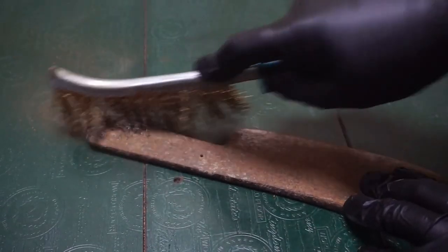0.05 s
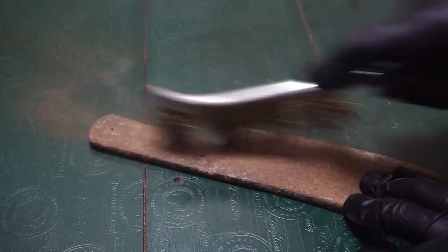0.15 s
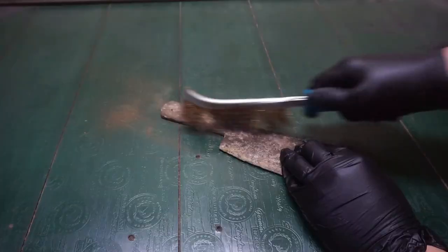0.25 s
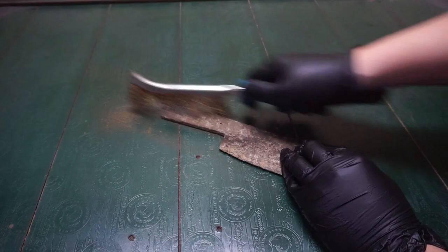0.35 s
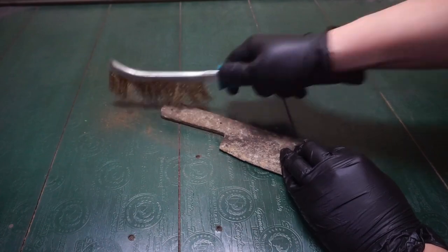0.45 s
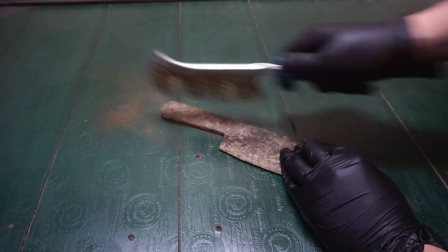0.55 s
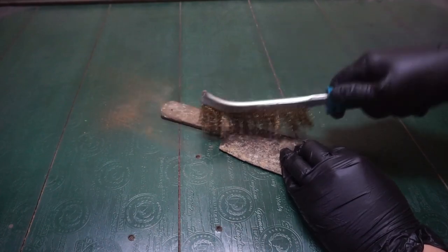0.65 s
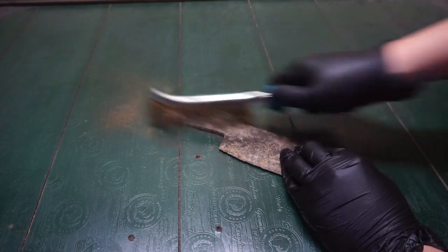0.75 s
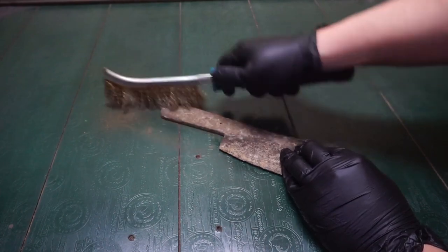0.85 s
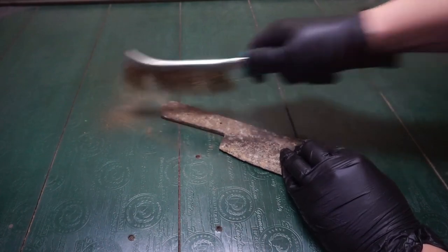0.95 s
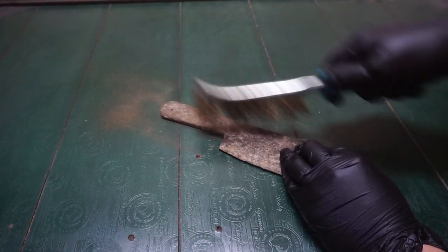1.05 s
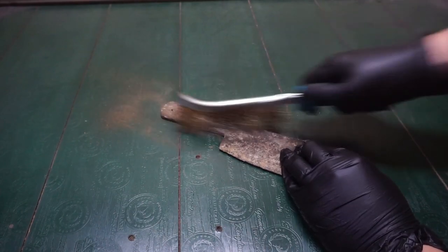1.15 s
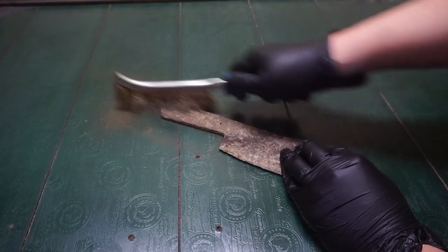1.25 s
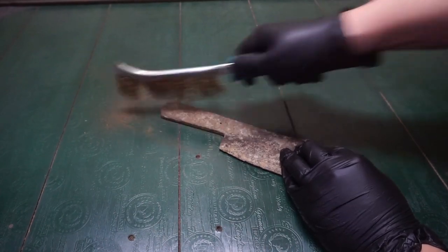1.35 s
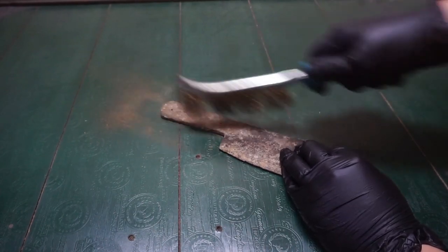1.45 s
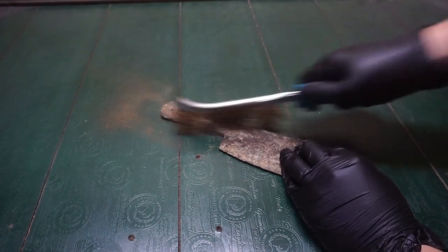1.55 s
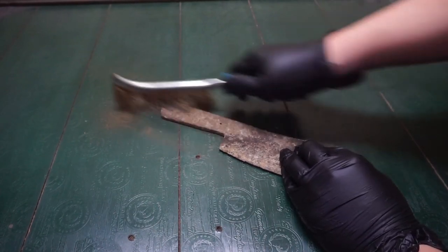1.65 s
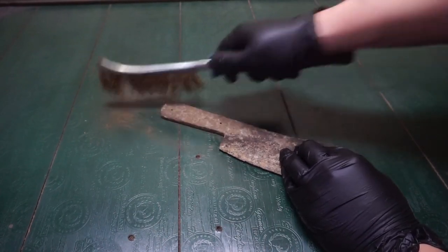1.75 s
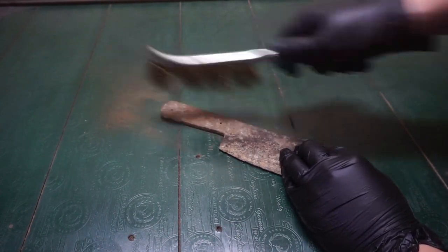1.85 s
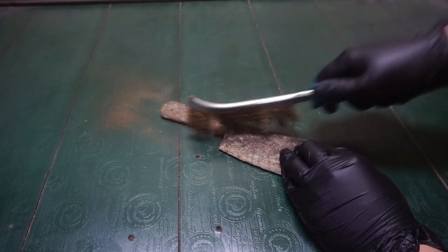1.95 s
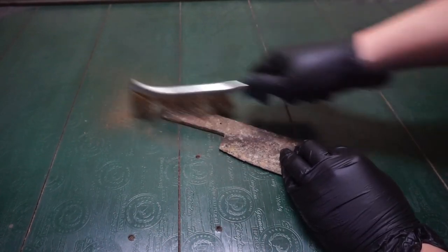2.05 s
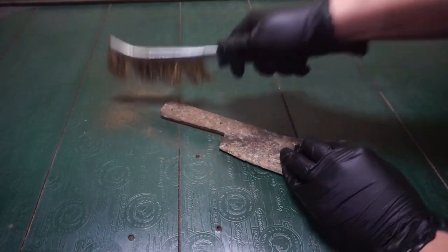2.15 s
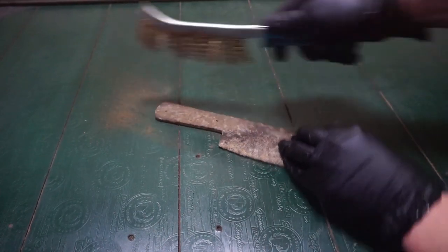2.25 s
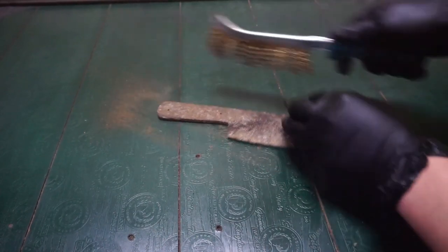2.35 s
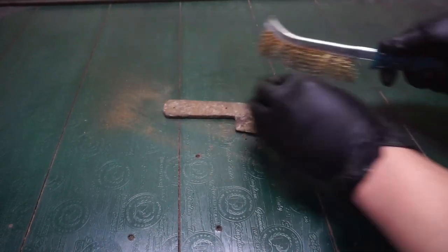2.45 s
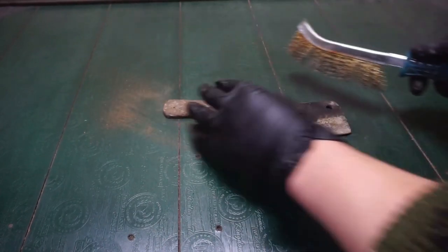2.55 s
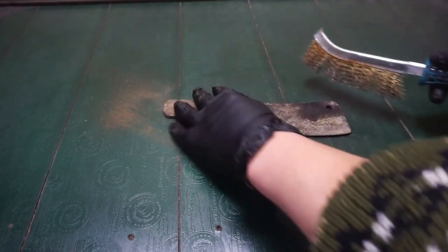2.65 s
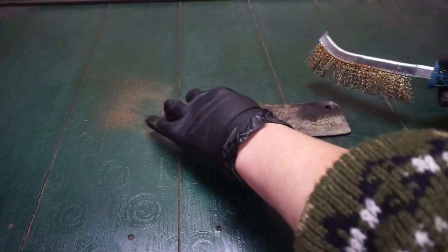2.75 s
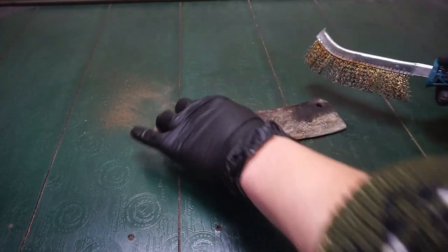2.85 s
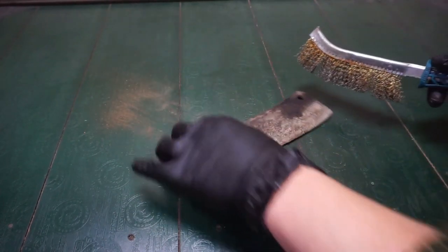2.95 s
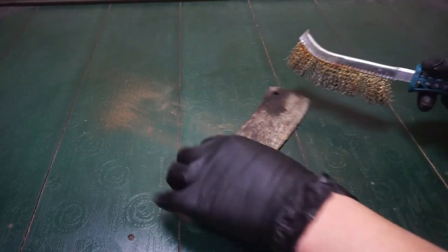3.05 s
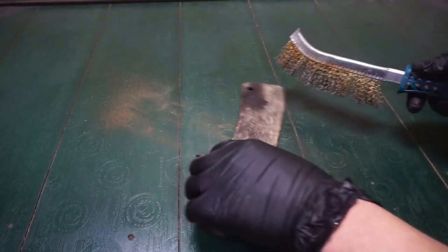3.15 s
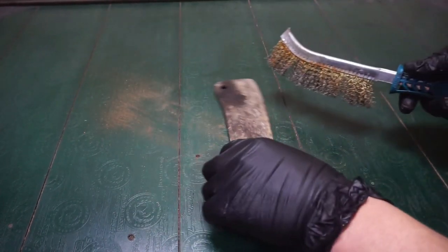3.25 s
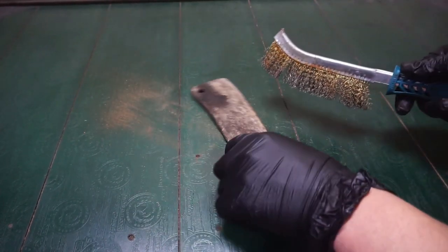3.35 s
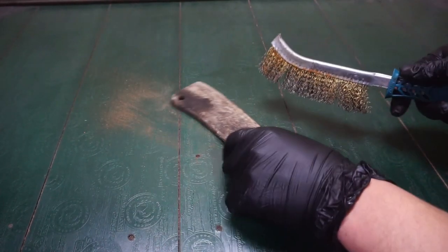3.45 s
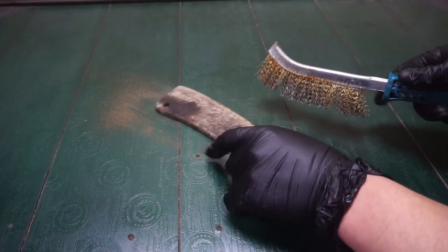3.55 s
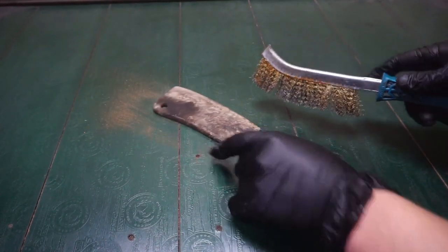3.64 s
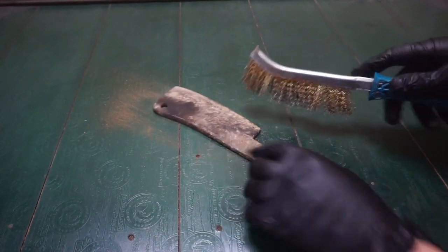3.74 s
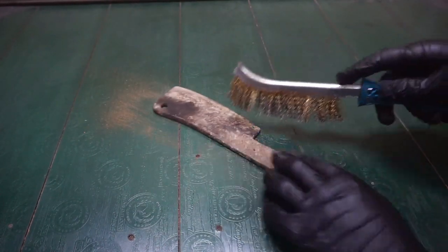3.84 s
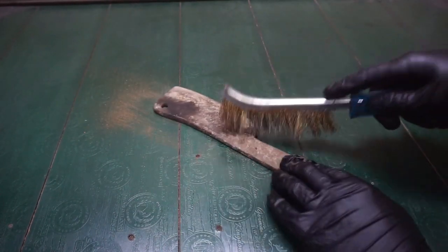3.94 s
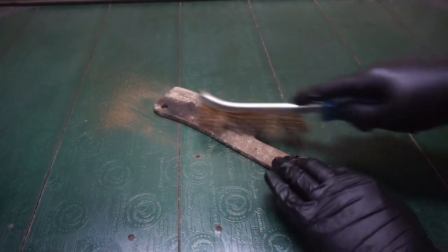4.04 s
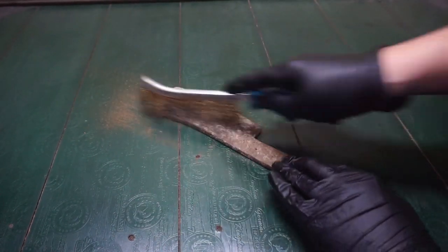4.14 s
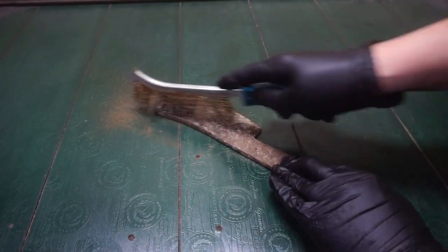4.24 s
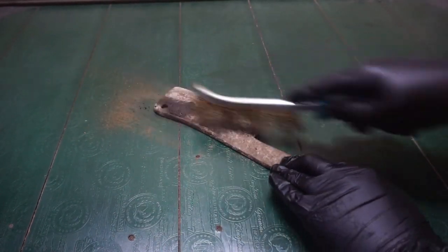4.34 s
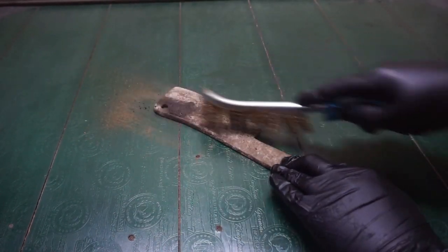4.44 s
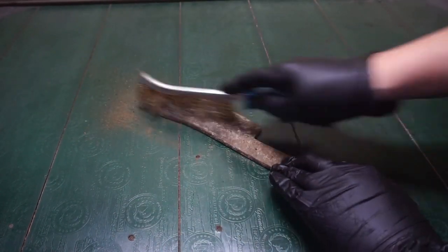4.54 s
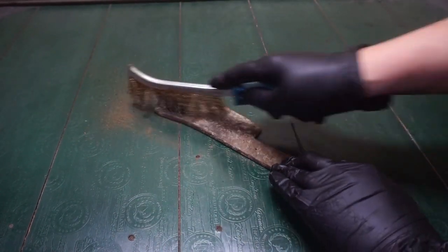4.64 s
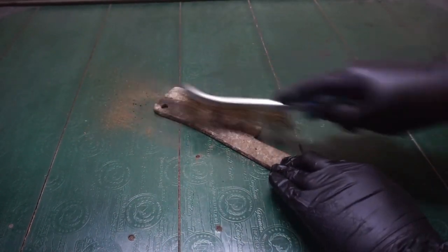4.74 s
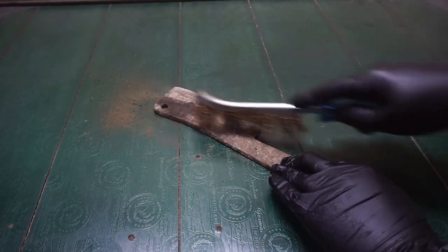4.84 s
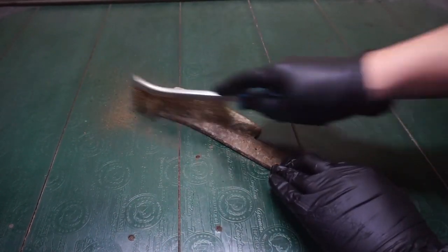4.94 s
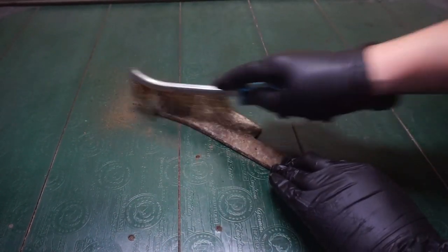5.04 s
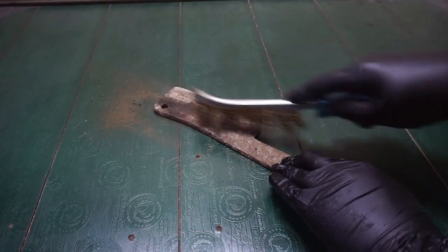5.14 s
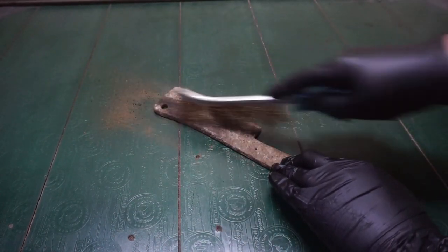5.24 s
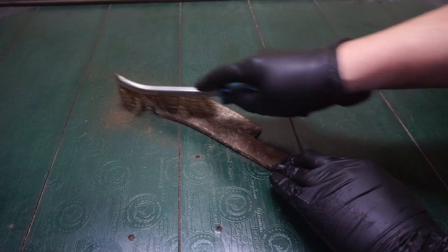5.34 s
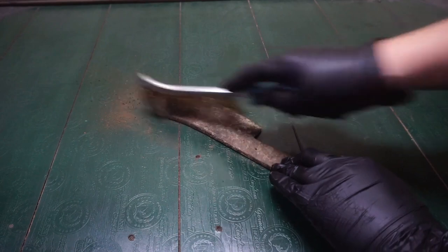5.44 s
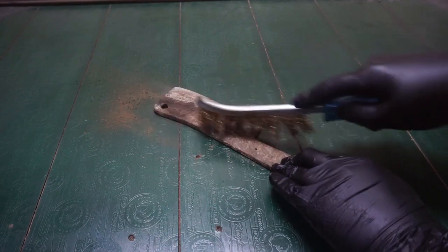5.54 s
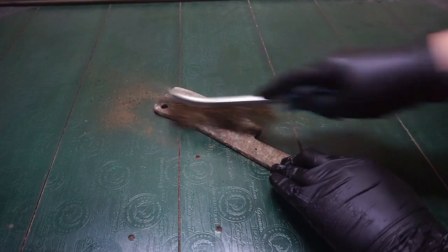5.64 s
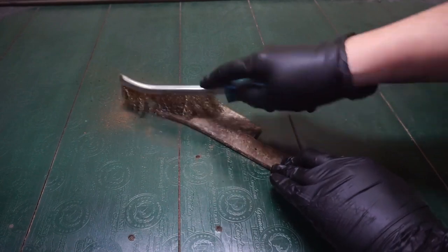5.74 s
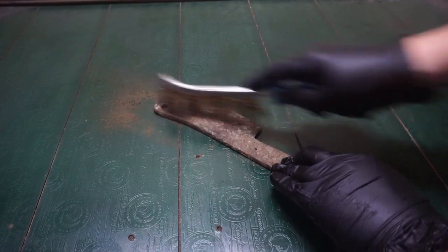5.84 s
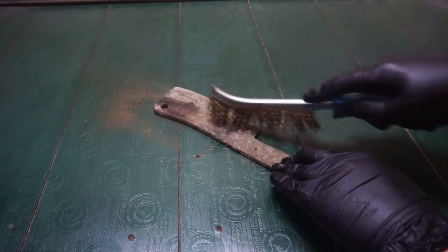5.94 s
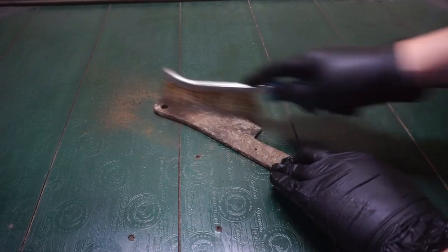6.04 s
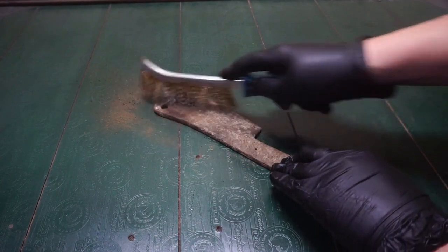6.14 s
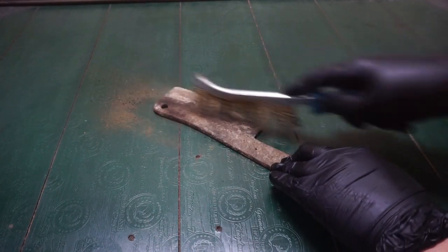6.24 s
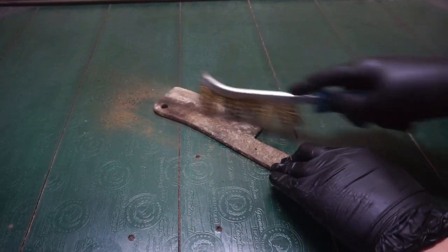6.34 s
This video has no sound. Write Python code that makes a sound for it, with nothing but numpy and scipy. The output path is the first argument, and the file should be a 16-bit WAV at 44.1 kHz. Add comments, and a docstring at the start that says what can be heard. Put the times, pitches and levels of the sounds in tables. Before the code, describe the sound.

Harsh, sizzling scrapes of stiff wire bristles on rusted metal, with hollow board drone and small thuds between them. After a brief lull, heavy metal grates and bumps over the planks as it is turned, with tiny crumbs snapping. Then faster alternating scrubs continue to the end, brighter and almost unbroken. Heard close in stereo, in a small room with a short echo.

```python
"""A brass wire brush scrubs a rusty steel cleaver that is held down on a wooden bench, in a small room.
Long strokes hiss along its handle, five of them after a knock on the bench as the brush lands.
The cleaver then judders round over the boards by stick and slip, with jolts and a few snapping crumbs.
Last, the brush lands on the blade and scrubs it with quick to-and-fro strokes.
Random wire catches are shaped into hiss and rasp, and excite resonances of wires, steel and boards."""
import sys
import numpy as np
from scipy import signal
from scipy.fft import rfft, irfft, next_fast_len
from scipy.io import wavfile
from scipy.ndimage import uniform_filter1d, map_coordinates

SR = 44100
rng = np.random.default_rng(int(sys.argv[2]) if len(sys.argv) > 2 else 0)


def master_out(mix):
    """Clip the mix to full scale and print it as 16-bit PCM to the path in sys.argv[1]."""
    frames = np.transpose(np.atleast_2d(mix))
    ceiling = np.clip(frames, -1, 1)
    pcm = np.round(ceiling * 32767).astype(np.int16)
    wavfile.write(sys.argv[1], SR, pcm)


N = 281794

# Landings of the brush, tip then heel; levels before the gains in contacts():
# start_s, tip_db, heel_db, scratch_db (relative to the blow), tick_db (first wires), crumple_db, boom_db
LANDINGS = [(0.285, -26.5, -41, -20, -62, -50, -54), (0.665, -33.5, -24.5, -1, -43, -43, -48),
            (1.101, -33.5, -30.5, -16, -51, -49.5, -51.5), (1.510, -41, -47, -15, -53, -51.5, -50.5),
            (1.954, -32, -31.5, -7.5, -51, -46.5, -51), (3.999, -48, -48, -17, -57, -64, -78)]
# Resonances of the bench top: pitch_hz, width_hz, level_db (relative)
BENCH_MODES = [(172, 11, -22.5), (225.3, 4.7, -11), (271, 22, -13), (352, 10, 1.5), (395.7, 43, -1.5),
               (445.4, 24.5, 4.5), (593, 14, -6), (663, 32, -9.5), (773, 71, -7.5), (874, 13, 0),
               (997, 19, -3), (1390, 14, -11.5)]
# Spectrum of wire tips on the handle: frequency_hz, level_db (relative, per Hz)
HANDLE_HISS = [(2350, -58), (4000, -10.5), (5870, -2), (7310, -6), (9940, -4), (10800, -1), (12000, -6),
               (14800, -3.5), (16000, -17)]
HEEL_S = 0.0195  # time from the tip's contact to the heel's, and on to the heel's rebound


def handle():
    """Transient friction: each long stroke gathers speed, bites and lifts off; a wire note sings out."""
    # Long strokes; levels before the gains below: touch_s, run_up_s, hold_s, hiss_db, rasp_db,
    # drone_db (bench), landing_db (drone on landing), singing_db (wire note)
    strokes = [ (0.0, 0.0018, 0.03, -36, -41, -37.5, -47, -55),
               (0.062, 0.088, 0.11, -38, -49, -50, -53.5, -55),
               (0.271, 0.046, 0.14, -35.5, -38.5, -38, -37.5, -44),
               (0.673, 0.086, 0.13, -34.5, -38.5, -40.5, -33.5, -39.5),
               (1.103, 0.094, 0.12, -34.5, -37.5, -39.5, -46, -41),
               (1.512, 0.1, 0.12, -35.5, -40, -47, -78, -43),
               (1.955, 0.089, 0.088, -34.5, -40, -45.5, -42, -44)]
    # Spectrum of the rust rasp: frequency_hz, level_db (relative, per Hz)
    rasp_spectrum = [(350, -28.5), (600, -11), (698, -3), (779, -11.5), (834, -6), (1040, -6), (1290, -2),
                     (2020, -7.5), (2780, -1.5), (3410, -8), (4500, -8.5), (5850, -12), (9900, -120)]
    # Resonances of wires and steel: pitch_hz, width_hz, level_db (relative)
    ring_modes = [(2730, 90, -4.5), (5700, 99, -14), (8570, 110, -5), (10350, 54, 3), (11480, 80, -17.5),
                  (12800, 110, 2.5), (13270, 55, 6), (14500, 54, 4.5)]
    # Spectrum of the boards under the brush's drag: frequency_hz, level_db (relative, per Hz)
    board_spectrum = [(25, -25), (45, -30), (64, -5.5), (90, -19), (125, -17), (220, -10), (300, -8.5),
                      (380, -1.5), (560, -4), (700, -12), (1100, -29), (2500, -57.5)]
    # Stereo balance: frequency_hz, left_minus_right_db
    balance = [(250, 0), (450, 0.5), (950, 1.5), (2380, 0.5), (5980, 2.5), (15000, 4.5)]
    touch, run_up, hold, hiss_db, rasp_db, drone_db, landing_db, singing_db = np.transpose(strokes)

    def stroke(level_db, slopes):
        """Enveloping: one sound of the strokes rises and falls at the given slopes, in dB per s."""
        return swells(touch + run_up, hold, level_db, slopes, touch)

    # the landing brush leans on the bench for a moment
    press = swells(touch + HEEL_S, 0.053, landing_db, (560, 220), touch)
    tips = stroke(hiss_db, slopes=(356, 330))
    bite = stroke(rasp_db, slopes=(380, 209))
    push = np.hypot(stroke(drone_db, slopes=(540, 237)), press)
    rubbing = scrub((tips, bite, push), HANDLE_HISS, rasp_spectrum, ring_modes, board_spectrum,
                    tip_rate=13000, clump_db=1.0, hiss_db=-0.6, ring_db=-4.5, damping=0.28,
                    rasp_db=0, drone_db=-10.5, boards_db=-4.0)
    wire_notes = np.array([fuzzy(10835, knots_per_s=110) for _ in range(2)])
    singing = stroke(singing_db, slopes=(400, 710)) * wire_notes
    bend = np.hypot(amp(-2) * stroke(drone_db, slopes=(300, 230)), amp(-1.5) * press)
    bristles = chatter(touch, top_hz=431.0, sag_hz=202.0, settle_s=0.058, knots_per_s=60)
    return placed(rubbing + singing, balance) + bend * bristles


def blade():
    """Sustained friction: quick strokes stay on the ringing blade, and each turn jostles the bench."""
    # Push and pull in turn; levels before the gains below:
    # start_s, hold_s, hiss_db, rasp_db, drone_db (bench), jostle_db
    strokes = [ (4.111, 0.11, -31.5, -45, -60, -53), (4.349, 0.094, -33.5, -46, -56.5, -53),
               (4.529, 0.1, -31, -43.5, -56, -45.5), (4.757, 0.083, -31.5, -43.5, -53, -53.5),
               (4.933, 0.091, -32.5, -41.5, -55.5, -48), (5.146, 0.072, -31.5, -45, -52.5, -50.5),
               (5.31, 0.085, -33.5, -41, -54, -54), (5.518, 0.084, -32, -41.5, -54.5, -45.5),
               (5.707, 0.081, -33, -41.5, -59.5, -47.5), (5.902, 0.082, -33, -46.5, -50, -51.5),
               (6.075, 0.075, -33.5, -47, -52.5, -50), (6.271, 0.054, -33, -49, -53.5, -49)]
    # Spectra of wire tips and of rust rasp: frequency_hz, level_db (relative, per Hz)
    hiss_spectrum = [(2350, -56), (4000, -7), (6740, -3), (7480, -6), (8310, 0.5), (9720, -6), (10900, 2.5),
                     (12000, -5.5), (13000, -1.5), (15000, -4), (16000, -15.5)]
    rasp_spectrum = [(350, -55), (600, -14), (884, -6.5), (1080, -8.5), (1180, -3.5), (1520, -6),
                     (1720, -3.5), (2290, -1), (2600, 1.5), (3490, -3.5), (4500, -8), (5850, -8),
                     (9900, -120)]
    # Resonances of wires and steel: pitch_hz, width_hz, level_db (relative)
    ring_modes = [(1725, 30, -8), (2620, 60, -8), (4150, 40, -9), (4600, 40, -9), (5730, 300, -11),
                  (6907, 55, -2), (8000, 150, -13), (8445, 45, 0), (10567, 40, 0), (10842, 55, 1),
                  (11450, 50, -2), (12688, 40, 2), (13270, 60, -10), (14460, 60, -6)]
    # Spectrum of the boards under the brush's drag: frequency_hz, level_db (relative, per Hz)
    board_spectrum = [(18, -47), (30, -48), (59, -2.5), (146, -13), (222, 0.5), (257, -7), (282, -7),
                      (397, 1), (478, -15.5), (567, -4), (700, -17), (910, -39), (1540, -120)]
    # Stereo balance: frequency_hz, left_minus_right_db
    balance = [(250, -2), (450, 0.5), (950, 1), (2380, -0.5), (5980, 2.5), (15000, 4.5)]
    start, hold, hiss_db, rasp_db, drone_db, jostle_db = np.transpose(strokes)
    touch = LANDINGS[-1][0]

    def contact(level_db, slopes, rest_db):
        """Enveloping: strokes stand on the steady contact of a brush that never leaves the blade."""
        moving = swells(start, hold, level_db, slopes, touch)
        resting = swells(start[0], N / SR, rest_db, (155, 120), touch)
        return np.hypot(moving, resting)

    tips = contact(hiss_db, slopes=(450, 460), rest_db=-48.5)
    bite = contact(rasp_db, slopes=(500, 195), rest_db=-56)
    push = contact(drone_db, slopes=(140, 180), rest_db=-61.5)
    # the bench is jostled as a push ends and just before the pull starts
    jostle_s, pull_lead_s, jostle_slopes = 0.008, 0.026, (420, 360)  # slopes: rise, fall in dB per s
    push_ends = swells((start + hold)[::2] - jostle_s, jostle_s, jostle_db[::2], jostle_slopes)
    pull_starts = swells(start[1::2] - pull_lead_s, jostle_s, jostle_db[1::2], jostle_slopes)
    bite = np.hypot(bite, amp(7.5) * push_ends)  # the wires dig in at the end of a push
    push = np.hypot(push, push_ends + pull_starts)
    rubbing = scrub((tips, bite, push), hiss_spectrum, rasp_spectrum, ring_modes, board_spectrum,
                    tip_rate=16000, clump_db=0.5, hiss_db=-1.04, ring_db=-3, damping=0.44,
                    rasp_db=-1.5, drone_db=-4.0, boards_db=-0.5)
    return placed(rubbing, balance)


def scrub(drive, hiss, rasp, ring, boards, tip_rate, clump_db, hiss_db, ring_db, damping,
          rasp_db, drone_db, boards_db):
    """Impulsive excitation: wire tips flick off the rust in tufts; the brush's drag shakes the bench."""
    tips, bite, push = drive
    tufts = amp(clump_db * wobble(160) + 0.6 * wobble(40))
    flicks = catches(tip_rate, spread_db=3.5) * tufts
    fizz = amp(hiss_db) * coloured(shifting(flicks, patchy_db=2.9), hiss)
    # a brush that bites hard also damps the steel, so light strokes ring more
    free = (1 + 4 * bite / tips) ** -damping
    notes = amp(ring_db) * free * rung(flicks, ring, wander_db=1.7, count=5)
    rust = shifting(catches(5000, spread_db=0.0) * tufts, patchy_db=3.0)
    grind = amp(rasp_db) * coloured(rust, rasp)
    drone = amp(drone_db) * rung(catches(1500, spread_db=0.5), BENCH_MODES, wander_db=4, count=2)
    drone += amp(boards_db) * coloured(catches(1500, spread_db=2.5), boards)
    return tips * (fizz + notes) + bite * grind + push * drone


def chatter(starts, top_hz, sag_hz, settle_s, knots_per_s):
    """Relaxation: bent bristles chatter in a hollow note that swells and rises after each touch."""
    t = np.arange(N) / SR
    age = np.abs(t - starts[np.searchsorted(starts, t, side="right") - 1])
    slow = np.exp(-age / settle_s)
    return (1 - slow) * fuzzy(top_hz - sag_hz * slow, knots_per_s)


def slide():
    """Stick-slip friction: the cleaver judders, scrapes and jolts over the boards, crushing rust dust."""
    # Shove aside, then swing round; levels before the gains below: time_s, judder_db, scrape_db, grit_db
    shove = [(2.22, -55, -65, -67), (2.328, -41.5, -38.5, -53.5), (2.386, -37.5, -36, -44),
             (2.478, -34, -50, -75), (2.572, -52, -74, -94.5), (2.634, -69, -93, -95),
             (2.66, -65, -91, -75)]
    swing = [(2.755, -80, -93, -89), (2.775, -44, -71, -90), (2.801, -30.5, -64, -77),
             (2.855, -37.5, -57, -67), (2.893, -31.5, -39.5, -60), (2.967, -29.5, -39.5, -51.5),
             (2.987, -39, -42, -43.5), (3.023, -24.5, -33.5, -44.5), (3.063, -30.5, -39.5, -45),
             (3.245, -28.5, -36, -45.5), (3.313, -29, -43.5, -54.5), (3.459, -35, -41.5, -44),
             (3.629, -43.5, -50.5, -53.5), (3.74, -79, -75, -81)]
    # Jolts on the boards, before the gains below: start_s, level_db
    jolt_events = [(2.403, -14.5), (2.461, -10.5), (2.481, -21), (2.885, -11), (2.949, -11), (3.103, -8),
                   (3.232, -15.5), (3.281, -14), (3.474, -14.5), (3.588, -22.5)]
    # Rustles as the gloved hand changes its grip, before the dust gain: start_s, hold_s, level_db
    rustles = [(2.665, 0.031, -69.5), (3.763, .055, -69.5), (3.925, .04, -73.5)]
    # Spectra of judder, scrape, grit and jolts: frequency_hz, level_db (relative, per Hz)
    judder_spectrum = [(94, -48), (160, -10), (308, -9.5), (350, -1), (446, -3.5), (512, -2.5), (652, 1),
                       (859, -10.5), (925, -30), (1010, -7), (1300, -16.5), (1400, -13), (1620, -20.5),
                       (2000, -17.5), (2600, -49), (4400, -120)]
    scrape_spectrum = [(760, -15.5), (1300, -0.5), (1400, -12.5), (1620, -4.5), (2970, -4.5), (3780, -7),
                       (4040, -14.5), (5500, -20), (7150, -56), (12100, -120)]
    grit_spectrum = [(2940, -7.5), (5000, -0.5), (5650, -9.5), (6130, -1.5), (12900, -8), (16000, -17)]
    jolt_spectrum = [(120, -43), (300, -0.5), (450, 7.5), (850, -1), (1800, -4), (3000, -30), (6000, -48)]
    # Resonances of the sliding cleaver: pitch_hz, width_hz, level_db (relative)
    steel_modes = [(1400, 60, 2), (1803, 40, -3), (2960, 110, -14), (4060, 70, 1), (4570, 60, -10),
                   (6090, 70, -19), (8450, 80, -19), (10600, 60, -21)]
    # Stereo balance: frequency_hz, left_minus_right_db
    balance = [(250, 0.15), (950, 0.84), (3770, 1.5), (15000, 1.5)]
    judder, scrape, grit = gains([shove, swing])
    grit = grit + swells(*np.transpose(rustles), slopes=(470, 94))
    # after each jolt the freed cleaver judders harder for a moment
    judder = np.hypot(amp(-1.0) * judder, amp(-19.5) * bursts(jolt_events, t60=0.21))
    grip = amp(1.3 * wobble(90) + 0.41 * wobble(29.53))
    slips = shifting(catches(1800, spread_db=0.5) * grip, patchy_db=2.0)
    boards = amp(-4) * coloured(slips, judder_spectrum)
    boards += amp(-2.5) * rung(catches(1800, spread_db=4) * grip, BENCH_MODES, wander_db=2.5)
    grains = catches(2500, spread_db=1.5) * grip
    rub = amp(-2.0) * coloured(shifting(grains, patchy_db=2.5), scrape_spectrum)
    # the steel rings most when it both bumps and scrapes
    steel = np.sqrt(judder * scrape) * amp(-11.5) * rung(grains, steel_modes, wander_db=0.5)
    dust = amp(1.0) * coloured(shifting(catches(4000, spread_db=3), patchy_db=5.0), grit_spectrum)
    jolt_noise = coloured(catches(6000, spread_db=0.5), jolt_spectrum)
    jolts = amp(-13.5) * bursts(jolt_events, t60=0.056) * jolt_noise
    return placed(judder * boards + scrape * rub + steel + grit * dust + jolts, balance)


def contacts():
    """Impact: landings ring and boom the bench, wires crumple and scratch; wires and crumbs snap."""
    # Bench modes under a blow: pitch_hz, level_db (relative), t60_s
    knock_modes = [(64.8, -7, .25), (116, -25.5, 0.19), (167.6, -18, 0.059), (226, 1, 0.16), (284, -10, .1),
                   (354, -8.5, 0.2), (520, -18.5, .05)]
    # Snaps of single rust crumbs, before the snap gain: start_s, level_db
    crumb_snaps = [(3.362, -26.5), (3.453, -27.5)]
    # Spectra of crumpling wires and of scratches: frequency_hz, level_db (relative, per Hz)
    crumple_spectrum = [(20, -31), (42, -20), (66, -2), (92, 4), (125, 2.5), (150, -13), (215, 6.5),
                        (260, -14.5), (350, -0.5), (600, -21), (1400, -19), (3000, -33.5), (8000, -57)]
    scratch_spectrum = [(300, -35), (700, -2.5), (1300, 4), (2500, -13), (3500, -25), (8000, -29)]
    t = np.arange(SR // 3) / SR
    times, *_, tick_db, crumple_db, boom_db = np.transpose(LANDINGS)
    blows = []
    for start, tip_db, heel_db, scratch_db, *_ in LANDINGS:
        # the heel rebounds once, 9 dB weaker
        for k, level_db in enumerate((tip_db, heel_db, heel_db - 9)):
            blows.append((start + k * HEEL_S, level_db, scratch_db))
    knocks = np.zeros(N + SR)
    for start, level_db, _ in blows:
        ring = np.zeros(len(t))
        for hz, mode_db, t60 in knock_modes:
            # each blow excites the modes a little differently
            decay = amp(mode_db + rng.normal(0, 2.7) - 60 * t / t60)
            ring += decay * np.sin(2 * np.pi * hz * t)
        knocks[round(start * SR):][:len(t)] += amp(level_db - 11) * ring

    def under_heel(level_db):
        """Enveloping: the wires buckle under the heel."""
        return swells(times + HEEL_S, 0.05, level_db, (420, 220), times)

    crumple = under_heel(crumple_db) * coloured(catches(9000, spread_db=1.5), crumple_spectrum)
    scratch_hits = [(start, level_db + relative_db) for start, level_db, relative_db in blows]
    scratch_noise = coloured(catches(2500, spread_db=6.5), scratch_spectrum)
    scratch = amp(-7.5) * bursts(scratch_hits, t60=0.095) * scratch_noise
    snap_noise = coloured(catches(20000, spread_db=3.5), HANDLE_HISS)
    snaps = amp(-6.5) * bursts([*zip(times, tick_db), *crumb_snaps], t60=0.024) * snap_noise
    boom = under_heel(boom_db) * amp(-2.0) * fuzzy(knock_modes[0][0], knots_per_s=22)
    return knocks[:N] + boom + pair(crumple + scratch + snaps)


def room(x, echo_db, tail_db):
    """Reverberation: one early echo combs the sound; a short diffuse tail grows duller as it dies."""
    # Decay times of the room: frequency_hz, t60_s
    decay_times = [(100, 0.71), (500, 0.38), (3000, 0.15), (8000, 0.23), (15000, 0.044)]
    echo_s = 0.01742
    hz, t, z = signal.stft(rng.standard_normal((2, SR // 2)), SR, nperseg=256)
    decay = amp(-60 * t / along(decay_times, hz)[:, None])
    tail = signal.istft(z * decay, SR, nperseg=256)[1]
    tail = tail / np.linalg.norm(tail[0])
    diffuse = pair(signal.fftconvolve(x, tail, axes=1)[:, :N])
    # a delay that also softens the treble
    echo = filtered(x, lambda f: np.exp(-2j * np.pi * f * echo_s) / np.hypot(1, f / 4000))
    return amp(echo_db) * echo + amp(tail_db) * diffuse


def quiet():
    """Stationary noise: a faint steady background, shaped by a smooth spectrum."""
    # Spectrum of the background: frequency_hz, level_db (relative, per Hz)
    quiet_spectrum = [(15, -39), (25, -9.5), (64, 8), (114, 10), (175, 4), (317, -3), (451, -21),
                      (1190, -44), (2480, -7), (8140, -41.5), (16000, -11)]
    return amp(-74.0) * pair(coloured(rng.standard_normal((2, N)), quiet_spectrum))


def catches(rate, spread_db):
    """Shot noise: random impulses of uneven size, unrelated signs on two channels, at rms 1."""
    hits = np.flatnonzero(rng.random(N) < rate / SR)
    sizes = amp(spread_db * rng.standard_normal(N)[hits])
    x = np.zeros((2, N))
    x[:, hits] = sizes * np.sign(rng.random((2, N))[:, hits] - 0.5)
    return unit(x)


def rung(x, modes, wander_db, count=3):
    """Modal excitation at rms 1: families of notes swell and fade as the contact wanders over nodes."""
    families = []
    for k in range(count):
        level = amp(wander_db * wobble(13))
        families.append(level * resonate((-1) ** k * x, modes[k::count]))
    return unit(sum(families))


def resonate(x, modes):
    """Resonance: x through a sum of damped second-order band-passes."""
    return filtered(x, lambda f: sum(amp(db) * 1j * f * width / (centre ** 2 - f * f + 1j * f * width)
                                     for centre, width, db in modes))


def shifting(x, patchy_db):
    """Time-varying filtering at rms 1: the colour drifts as the contact moves over the steel."""
    z = signal.stft(x, nperseg=1024)[2]
    field = uniform_filter1d(rng.standard_normal(z.shape[1:]), size=4, axis=0)  # over frequency
    field = uniform_filter1d(field, size=8, axis=1)  # over time
    return unit(signal.istft(z * amp(patchy_db * unit(field)), nperseg=1024)[1][:, :N])


def fuzzy(hz, knots_per_s):
    """Narrow-band noise at rms 1: a carrier with randomly wandering amplitude and phase."""
    phase = 2 * np.pi * np.cumsum(hz * np.ones(N)) / SR
    return unit(wobble(knots_per_s) * np.cos(phase) + wobble(knots_per_s) * np.sin(phase))


def wobble(knots_per_s):
    """Slow modulation: a smooth curve through random knots."""
    coarse = np.arange(0, N + 32, 32)
    knots = rng.standard_normal(int(N * knots_per_s / SR) + 4)
    return np.interp(np.arange(N), coarse, map_coordinates(knots, [coarse * knots_per_s / SR]))


def swells(starts, holds, levels_db, slopes, touches=0):
    """Exponential envelope: rise, hold and fall at steady dB per s; -120 dB until the touch."""
    t = np.arange(N) / SR
    rise, fall = slopes
    level = np.full(N, -120.0)
    for start, hold, db, touch in np.broadcast(starts, holds, levels_db, touches):
        shape = np.minimum(0, np.minimum(rise * (t - start), fall * (start + hold - t)))
        level = np.where(t >= touch, np.maximum(level, db + shape), level)
    return amp(level)


def bursts(events, t60):
    """Free decay: an envelope leaps up at each event and dies away."""
    t = np.arange(SR // 2) / SR
    attack = 1 - np.exp(-t / min(t60 / 50, 0.0015))
    shape = amp(-60 * t / t60) * attack
    envelope = np.zeros(N + SR)
    for start, level_db in events:
        envelope[round(start * SR):][:len(t)] += amp(level_db) * shape
    return envelope[:N]


def gains(tables):
    """Logarithmic interpolation: one gain curve per dB column, -120 dB outside each gesture."""
    t = np.arange(N) / SR
    total = 0
    for rows in tables:
        times, *columns = np.transpose(rows)
        total = total + np.array([amp(np.interp(t, times, c, left=-120, right=-120)) for c in columns])
    return total


def placed(x, balance):
    """Interchannel level difference: a stereo pair tilts to left or right, by frequency."""
    return filtered(pair(x), lambda hz: amp(np.outer([0.5, -0.5], along(balance, hz))))


def pair(x):
    """Spatial coherence: two unrelated signals become alike in the bass, less so in the treble."""
    # Likeness of left and right: frequency_hz, correlation (1 is identical)
    likeness = [(60, 1), (130, 0.96), (290, 1), (640, 0.8), (1410, 0.73), (3100, 0.6), (6820, 0.31),
                (15000, 0.51)]

    def mid_side(hz):
        """Mixing angle: the correlation sets the share of mid and side."""
        turn = np.arccos(np.clip(along(likeness, hz), -1, 1)) / 2
        return np.array([np.cos(turn), np.sin(turn) * hz / np.hypot(hz, 350)])  # less side in the bass

    mid, side = filtered(x, mid_side)
    return np.array([mid + side, mid - side])


def coloured(x, spectrum):
    """Spectral shaping: x through a smooth spectrum, at rms 1."""
    return unit(filtered(x, lambda hz: amp(along(spectrum, hz))))


def filtered(x, response):
    """Linear filtering: the spectrum of x times a complex response of frequency."""
    m = next_fast_len(N + SR // 2)
    return irfft(rfft(x, m) * response(np.fft.rfftfreq(m, 1 / SR)), m)[..., :N]


def along(points, hz):
    """Logarithmic frequency: (frequency_hz, value) points read on a log axis."""
    f, v = np.transpose(points)
    return np.interp(np.log(hz + 1), np.log(f + 1), v)


def amp(db):
    """Decibel law: decibels to amplitude gain."""
    return 10 ** (np.asarray(db) / 20)


def unit(x):
    """Normalisation: scale to rms 1."""
    return x / np.sqrt(np.mean(x ** 2) + 1e-20)


def scene():
    """Superposition: the work on the bench, the room's answer and the faint background."""
    work = handle() + blade() + slide() + contacts()
    return work + room(work, echo_db=-8.0, tail_db=-15.5) + quiet()


def record(dry):
    """Band limiting: nothing passes at or above 15800 Hz."""
    return filtered(dry, lambda hz: hz < 15800)


dry = scene()
out = record(dry)
master_out(out)
```